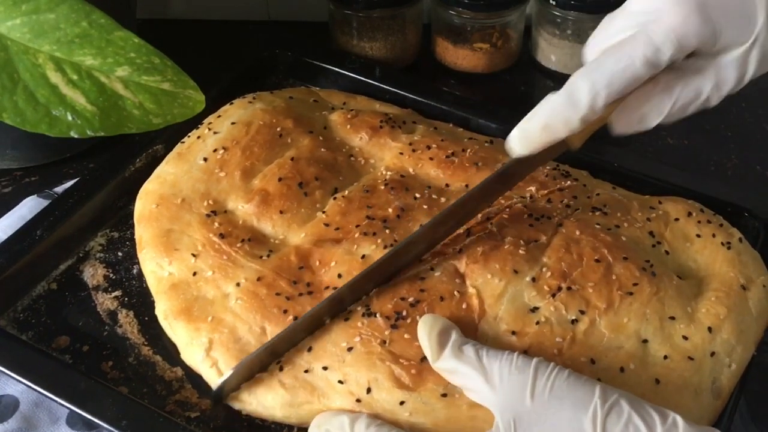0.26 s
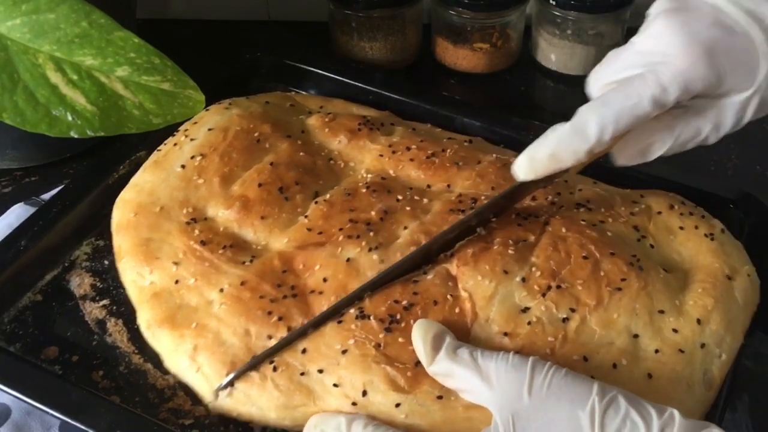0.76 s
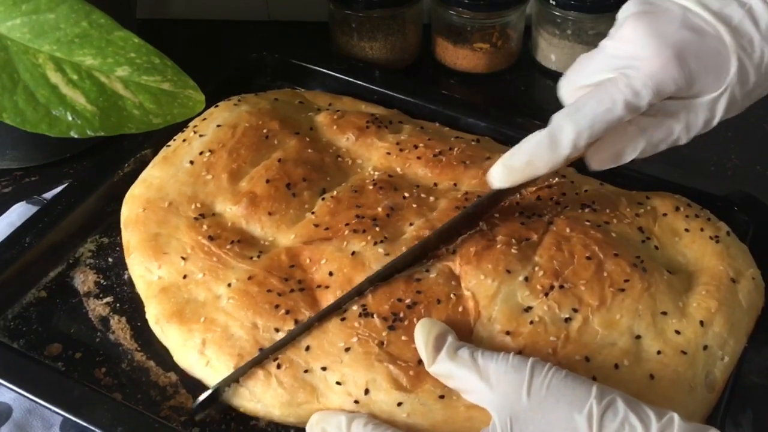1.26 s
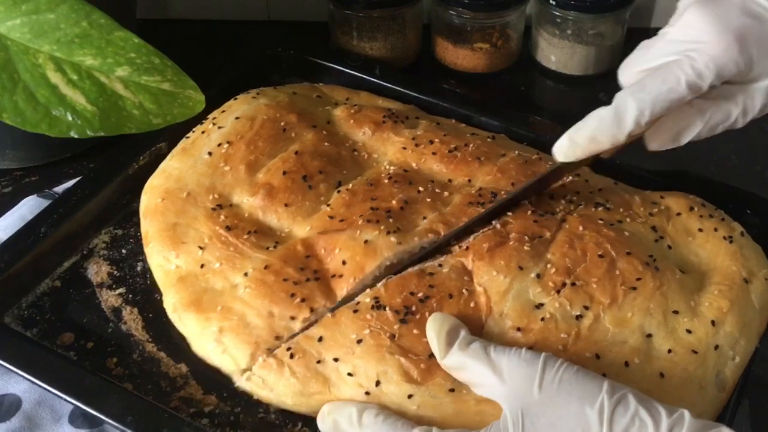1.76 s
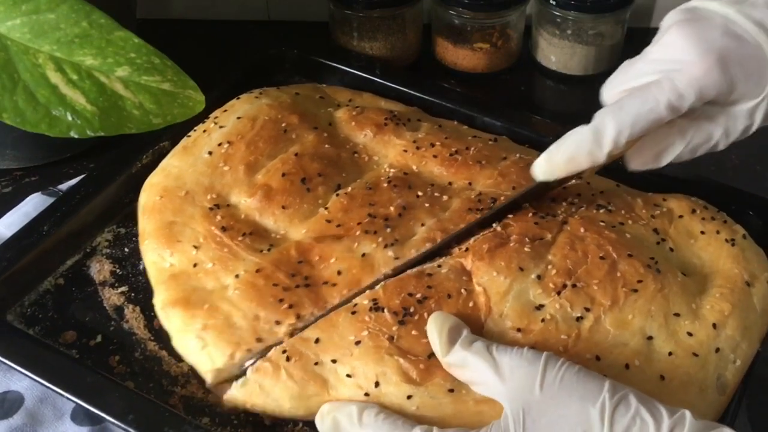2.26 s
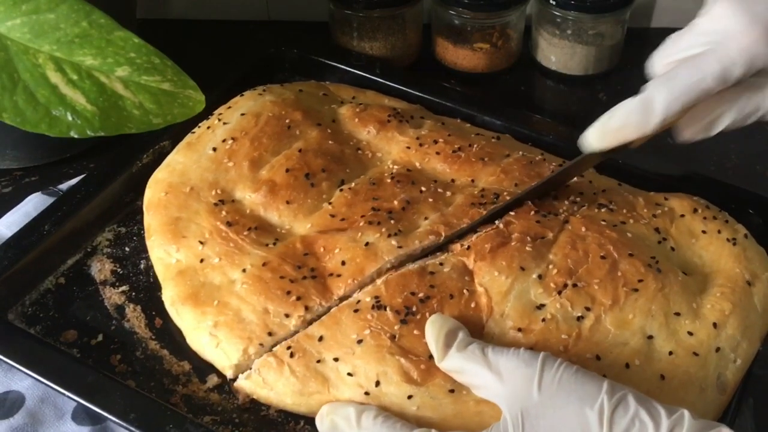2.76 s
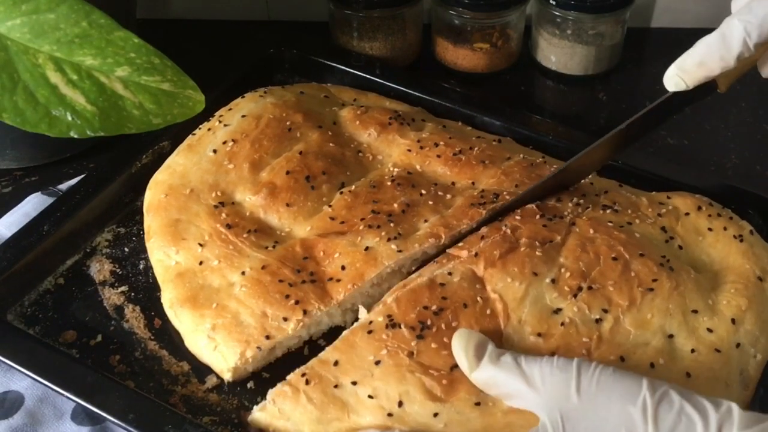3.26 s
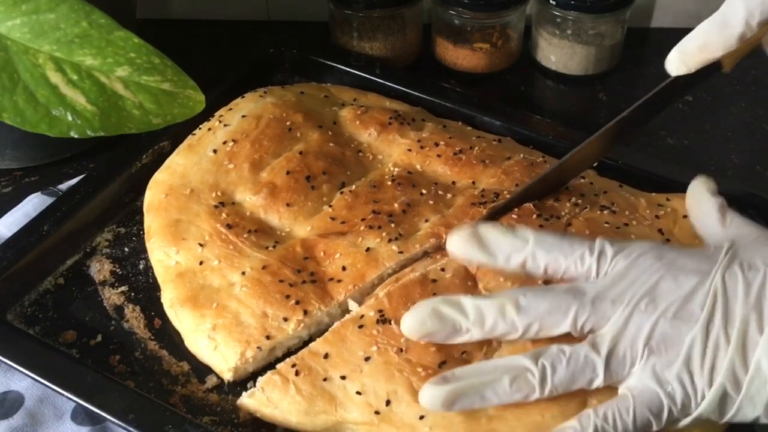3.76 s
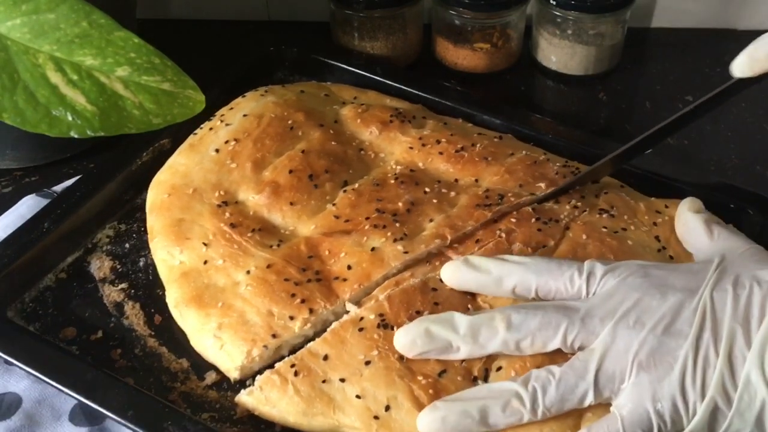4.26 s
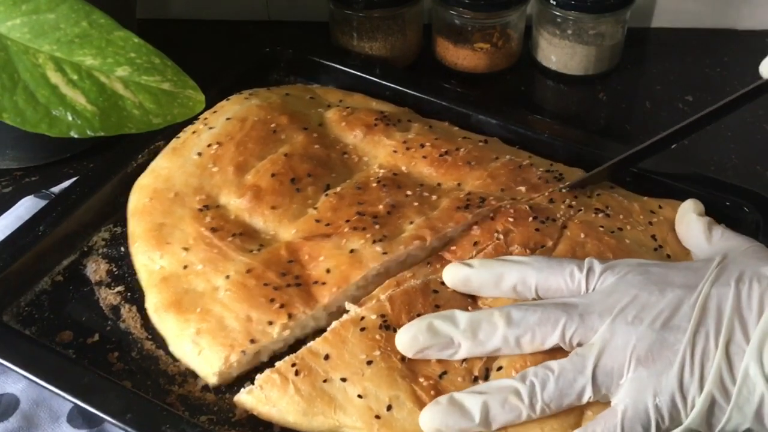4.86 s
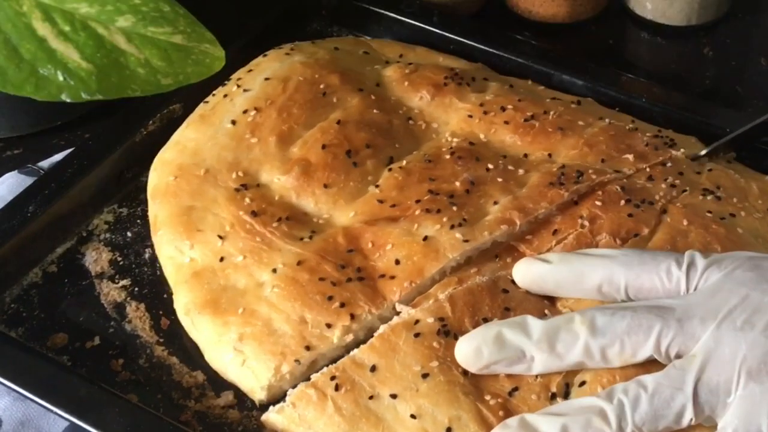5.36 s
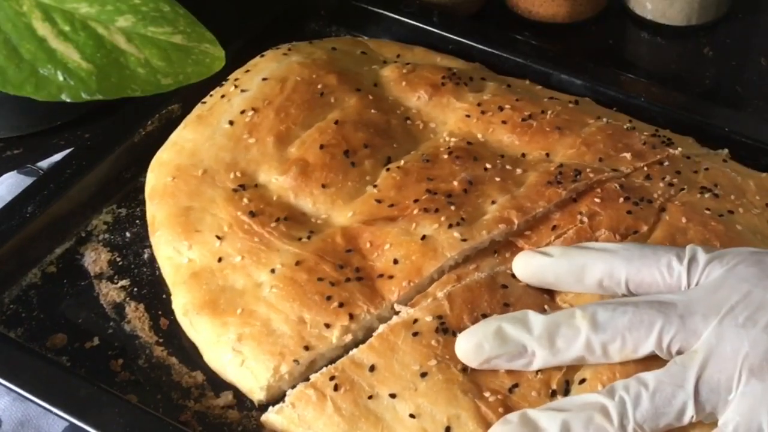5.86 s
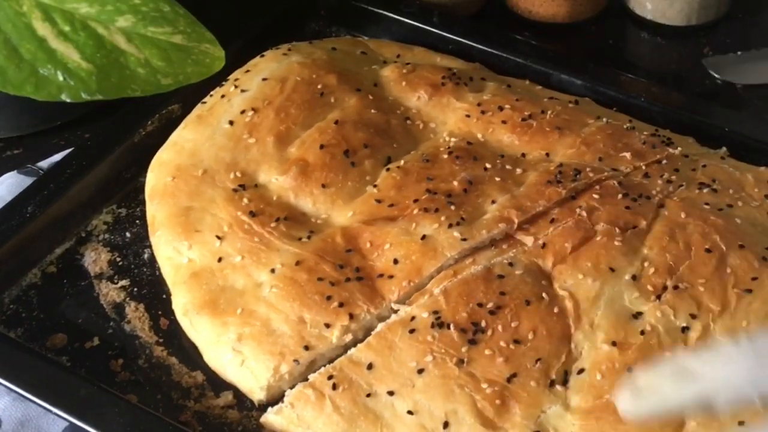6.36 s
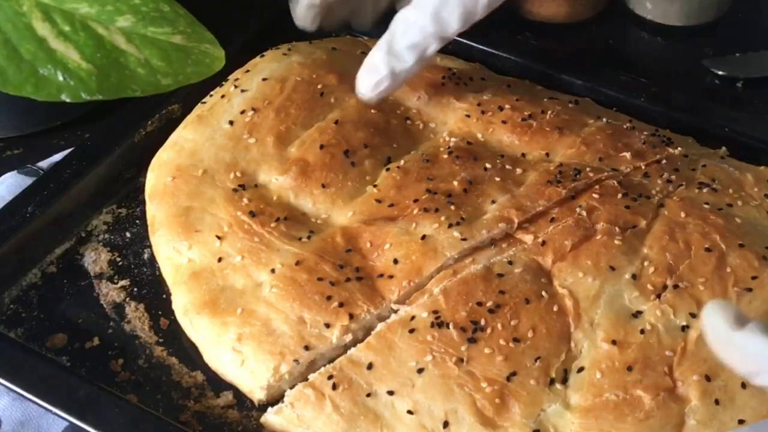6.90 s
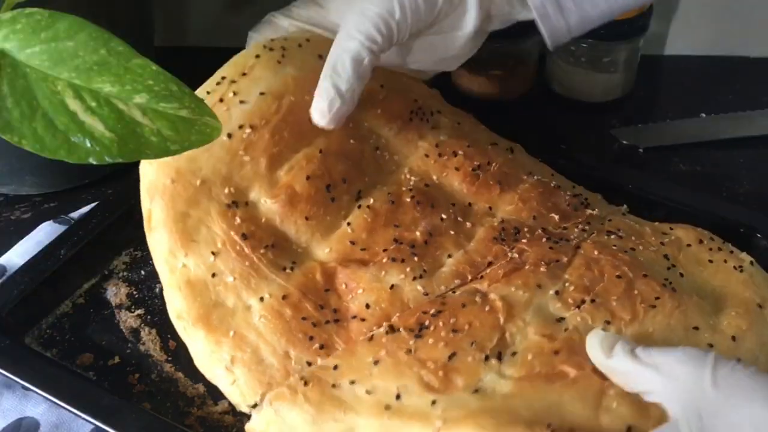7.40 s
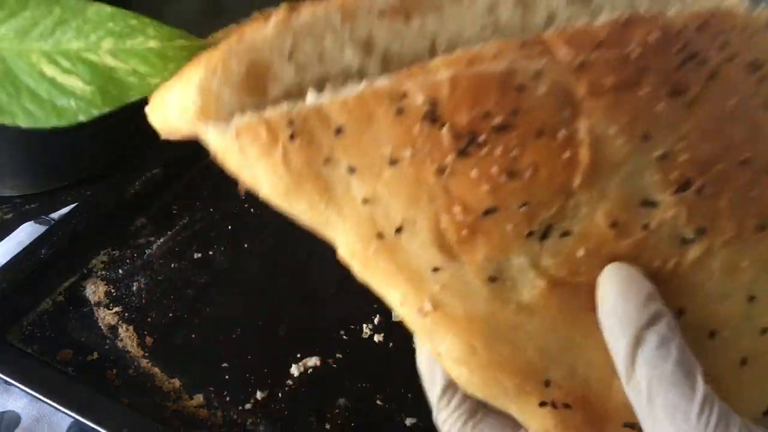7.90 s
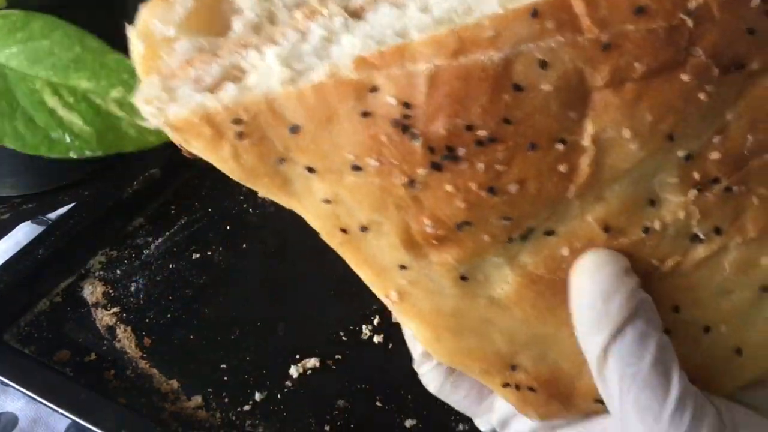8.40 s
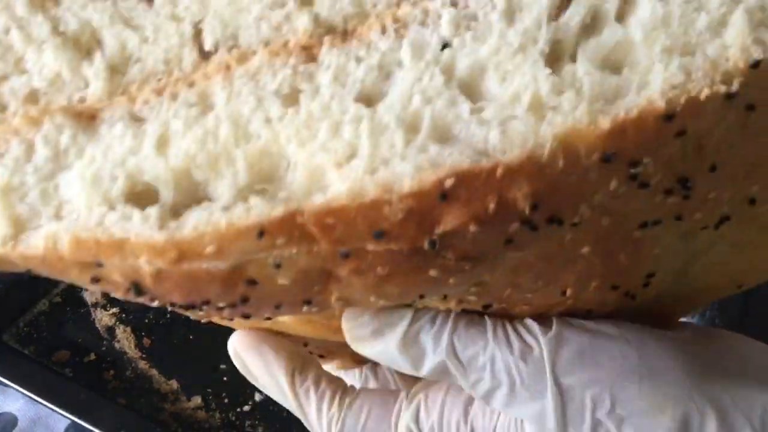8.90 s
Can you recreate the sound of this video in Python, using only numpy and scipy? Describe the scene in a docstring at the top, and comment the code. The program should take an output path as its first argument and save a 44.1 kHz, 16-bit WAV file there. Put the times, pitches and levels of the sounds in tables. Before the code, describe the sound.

A quiet kitchen, heard close, with a low mains-like hum and faint air throughout. From 0 to 2 s, a serrated knife makes soft, bright, dry rasps on bread crust, with a barely audible thin metallic singing at first and light tray touches near 1.2 and 1.5 s. A sharp knock lands at 2.1 s, another at 2.5 s, among duller, grainier strokes. Sawing stays faint until a hard crack at 4.25 s. A tight cluster of knocks comes at 5.0 s, then from 5.3 to 5.8 s a rapid, irregular metallic rattle with crunch, ending in a stronger rasp. Small clicks at 6.1 s precede a loud double clack at 6.34 s as the knife lies down, settling by 6.7 s. Until about 9 s, only faint glove rubs, tiny crust ticks and fine crackle remain. The level dips momentarily near 5.2, 7.0 and 7.9 s.

```python
"""A low hum and faint rasping strokes open: a serrated knife saws a crusty loaf on a baking tray in a kitchen.
Rasps are dense random slips; teeth catching on the tray strike its decaying modes, with cracks and rattle.
The knife is laid on the counter (blade modes and clicks), then gloves rub the loaf and its crust ticks
(noise puffs). Filtered noise and tones make the room; the level dips briefly three times."""
import sys
import numpy as np
from scipy import signal
from scipy.fft import rfft, irfft, next_fast_len
from scipy.io import wavfile
from scipy.ndimage import uniform_filter1d

SR = 44100
rng = np.random.default_rng(int(sys.argv[2]) if len(sys.argv) > 2 else 0)


def wav_out(sig):
    """Save sig, one row per channel (or a flat mono array), as 16-bit PCM at SR to the path in sys.argv[1]."""
    wavfile.write(sys.argv[1], SR, np.round(np.clip(np.atleast_2d(sig).T, -1, 1) * 32767).astype(np.int16))


def undo_db(level):
    """Turn decibels back into plain size, where 20 dB means ten times bigger."""
    steps = np.asarray(level, float) / 20
    return 10 ** steps


N = 403074

# room air spectrum: pitch_hz, relative_density_db
ROOM_SPECTRUM = [(18, -55), (30, -41.5), (48, -19.5), (103, -6.5), (127, -11.5), (204, -17), (262, -21),
                 (311, -16), (473, -24.5), (684, -22), (1670, -27.5), (2610, -35.5), (4420, -42.5),
                 (13000, -53.5), (16000, -62)]
# appliance drone envelope: time_s, level_db
DRONE_LEVEL = [(0, -52.5), (1.14, -67), (1.37, -53.5), (4.27, -53.5), (4.73, -44), (5.06, -63.5),
               (6.16, -54), (9.14, -59.5)]
# decay of the kitchen reflections: pitch_hz, t60_s
KITCHEN_DECAY = [(300, 0.29), (1500, 0.55), (4000, 0.29), (12000, 0.34)]
# crust and crumb fractures: start_s, relative_level_db, puff_centre_hz
CRUST_TICKS = [(0.1106, -55, 10600), (1.1775, -39, 3600), (1.5005, -49, 9100), (2.2044, -47, 3180),
               (2.2314, -45, 4400), (2.24, -36, 1800), (2.2409, -43, 6940), (2.468, -39, 2950),
               (3.0066, -51, 4300), (3.483, -42, 3690), (3.5297, -40.5, 3060), (4.811, -40, 2300),
               (4.8324, -45, 3110), (5.0683, -44, 3400), (5.174, -39, 3010), (5.5426, -39.5, 3157),
               (6.7986, -43, 5360), (6.8528, -51, 4530), (6.9648, -38.5, 4420), (6.9724, -44, 6240),
               (6.982, -45, 5280), (7.17, -41, 13200), (7.3495, -44, 13200), (7.3692, -49, 5940),
               (7.4205, -42.5, 3110), (7.4794, -45, 6170), (7.695, -44, 1400), (7.6975, -50, 6200),
               (7.716, -37.5, 4030), (8.0461, -48.5, 3700), (8.085, -49, 11500), (8.1225, -50, 8060),
               (8.4896, -45, 5450), (8.524, -49, 12000), (8.587, -48, 3580), (8.8144, -51, 3260),
               (8.9426, -45, 12900)]
# knife touching the counter: start_s, relative_level_db, low_mode_gain_db
COUNTER_TOUCHES = [(6.1148, -22.5, 7), (6.1215, -30, -2), (6.1409, -30, 3), (6.1614, -33, 3),
                   (6.171, -39, -10), (6.186, -35, -2), (6.205, -41, -15), (6.219, -37, -15),
                   (6.2634, -42, -20), (6.2787, -35.5, -33), (6.3394, -10, -0.5), (6.3492, -10.5, -20),
                   (6.479, -27.5, -28), (6.508, -26, -6), (6.5273, -31, 22), (6.543, -24.5, -13),
                   (6.5566, -25.5, -8.5), (6.5764, -27, -20), (6.6084, -31.5, -23), (6.6554, -38, -23),
                   (6.667, -42, -24)]
# blade modes: pitch_hz, level_db, t60_s, lying_down_gain_db
BLADE_MODES = [(2093, -3, 0.076, 7.5), (2630, 4.5, 0.036, -7), (3440, 2, 0.048, -4), (4280, -11, 0.06, 7),
               (5080, -8, 0.035, 2), (5820, -15.5, 0.12, 14), (6200, -17, .04, 3), (6960, -13, .07, -15),
               (8900, -27, 0.04, -3), (11850, -21.5, 0.1, 9), (14100, -4, 0.012, 3), (1530, 0, 0.026, -7),
               (826, -6, 0.012, 1)]
# gloves rubbing on the crust: start_s, length_s, relative_level_db
GLOVE_RUBS = [(6.49, 0.13, -62), (6.93, 0.18, -67), (7.4, 0.15, -61), (7.68, 0.096, -75),
              (8.48, 0.038, -65), (8.59, 0.21, -64.5), (8.93, 0.041, -68)]
# blade strokes through the crust: start_s, length_s, relative_level_db
KNIFE_STROKES = [(.07, 0.12, -72), (.23, 0.12, -67.5), (.4, 0.14, -61), (.55, 0.12, -62),
                 (.73, 0.11, -62.5), (1.06, 0.14, -68), (1.26, 0.12, -63.5), (1.44, .13, -67.5),
                 (1.57, 0.063, -65.5), (1.62, 0.11, -63), (1.8, 0.2, -60), (2.012, 0.056, -43.5),
                 (2.27, 0.046, -57.5), (2.36, .125, -53.5), (2.55, 0.15, -61), (2.73, 0.18, -54.5),
                 (2.995, 0.056, -60.5), (3.44, 0.16, -68.5), (3.74, 0.097, -64), (4.03, 0.064, -68.5),
                 (4.36, 0.12, -66), (4.49, 0.087, -67.5), (4.8, 0.081, -59.5), (4.9, 0.22, -67),
                 (5.22, 0.12, -65.5), (5.69, 0.063, -45.5)]
# bright rasp spectrum: pitch_hz, relative_density_db
RASP_SPECTRUM = [(1470, -21), (2500, 3), (4270, 6), (5560, 6), (7420, 4), (8800, 7), (10500, -1),
                 (12800, 2.5), (16000, -3)]
# teeth catching on the tray: start_s, level_db, relative_treble_db, favoured_pitch_hz
TRAY_CATCHES = [(.002, -41.5, -64, 1730), (1.1833, -30, -51, 2380), (1.5288, -37, -55, 2360),
                (1.543, -40.5, -69, 1740), (1.917, -37.5, -54, 2400), (1.934, -33, -61, 2450),
                (2.031, -29, -48, 3600), (2.0869, -13, -31, 2560), (2.112, -43, -66, 3180),
                (2.4907, -17.5, -37.5, 2090), (4.2523, -10, -24, 2070), (4.8438, -35, -60, 1400),
                (4.974, -10, -28, 1900), (4.9914, -10, -39, 2590), (5.011, -11, -40, 2500),
                (5.03, -13, -36, 2670), (5.047, -12, -38, 2620), (5.127, -29, -62, 2530),
                (5.138, -20.5, -41, 2210), (5.3153, -13.5, -34, 3100), (5.3267, -11, -49.5, 2566),
                (5.3454, -11, -46, 2630), (5.354, -17, -45.5, 2570), (5.3694, -13, -38.5, 2695),
                (5.3974, -13, -31.5, 3025), (5.411, -21, -55, 2840), (5.439, -19, -41.5, 2570),
                (5.4918, -23.5, -44.5, 2280), (5.5102, -14.5, -38.5, 2480), (5.5227, -18, -40.5, 2250),
                (5.6055, -20, -51.5, 3150), (5.6295, -20, -41, 1390), (5.6364, -9.5, -31.5, 3150),
                (5.6487, -22, -56, 2542), (5.661, -7, -26.5, 2840), (5.681, -9.5, -34, 3200),
                (5.6995, -11.5, -31, 1314), (5.7255, -16.5, -35, 3000), (5.762, -20, -39, 2800)]
# tray modes: pitch_hz, level_db, t60_s, flat_blade_gain_db, light_touch_gain_db
TRAY_MODES = [(387, -26.5, 0.076, 5, 7), (675, -18.5, 0.011, 15.5, -3), (1175, -11.5, 0.036, -1, 4),
              (1330, -4, 0.024, -5.5, 5), (1425, -9.5, 0.046, -3.5, 0), (1755, -2, 0.0137, -10.5, 12),
              (1900, -2, 0.012, -2, 8), (2085, -10, 0.021, 6.5, -4), (2300, -2.5, 0.014, 0.5, -4),
              (2450, -13.5, 0.037, 1, 14), (2560, -2, 0.024, 0.5, -5.5), (2906, -5, 0.0086, 4, -20),
              (3080, -2.5, 0.013, -2, -3), (3200, -2.5, 0.019, 5.5, -11), (3650, -16.5, 0.026, 6, 3),
              (3894, -7.5, 0.018, -1, -3.5), (4450, -12.5, 0.02, -4, 5), (800, -23.5, 0.02, 11, -8),
              (1060, -21.5, .02, 4, -5), (4890, -15.5, 0.01, 6, -2), (5395, -15.5, 0.013, 9.5, -7)]
# brief level dips: centre_s, half_length_s
LEVEL_DIPS = [(5.201, 0.026), (7.034, 0.033), (7.864, 0.027)]

GRIT_LIGHT, GRIT_HARD = .8, .35  # unevenness of the contact drive
DETUNE = .012  # relative mode scatter per catch: the loaf loads the tray differently
SPOT_SCATTER_DB = 2


def evened(x):
    """Scales to rms 1."""
    return x / np.sqrt(np.mean(x ** 2) + 1e-20)


def read(points, hz):
    """Reads a spectrum table on a log-frequency axis."""
    f, value = np.transpose(points)
    return np.interp(np.log(hz + 1), np.log(f + 1), value)


def curve(rows):
    """Columns of a curve table at every sample."""
    s, *columns = np.transpose(rows)
    return [np.interp(np.arange(N) / SR, s, c) for c in columns]


def add(mix, start_s, sound):
    """Mixes a sound in at a time."""
    part = mix[round(start_s * SR):][:len(sound)]
    part += sound[:len(part)]


def coloured(x, points):
    """Gives a long signal a spectrum, rms 1."""
    size = next_fast_len(len(x))
    gain = undo_db(read(points, np.fft.rfftfreq(size, 1 / SR)))
    return evened(irfft(rfft(x, size) * gain, size)[:len(x)])


def band(x, lo_hz, hi_hz):
    """Band-pass."""
    edges_hz = [lo_hz, min(hi_hz, .49 * SR)]
    return signal.sosfilt(signal.butter(2, edges_hz, "band", fs=SR, output="sos"), x)


def fuzzy(hz, width_hz):
    """A tone whose height and phase wander: narrow noise, rms 1."""
    r = np.exp(-np.pi * width_hz / SR)
    noise = rng.standard_normal(N) + 1j * rng.standard_normal(N)
    slow = signal.lfilter([1], [1, -2 * r, r * r], noise)
    return evened((slow * np.exp(2j * np.pi * hz * np.arange(N) / SR)).real)


def strike(modes, gains_db, contact_ms, ring_db=-99, ring_t60_s=.1, grit=GRIT_HARD, detune=DETUNE):
    """A short gritty contact swings up every mode; an after-ring spreads over its close neighbours."""
    t = np.arange(SR // 4) / SR
    hz, db, t60_s = np.transpose(modes)[:, :, None]
    u = t[:1500] * 1000 / max(contact_ms, .2)
    push = np.exp(-u ** 2) + 3.5 * np.exp(-8 * u)  # hardest at first touch
    a, b = rng.standard_normal((2, len(hz), 1500))
    rough = (a + 1j * b) * push / np.linalg.norm(push) / np.sqrt(2)
    drive = push / push.sum() + grit * rough
    swing = signal.fftconvolve(drive, undo_db(-60 * t / t60_s), axes=1)[:, :len(t)]

    tune, start = 1 + detune * rng.standard_normal(hz.shape), rng.random(hz.shape)
    spread, phase = rng.uniform(-0.85, 1, (2, 5, *hz.shape))
    neighbours = np.sin(2 * np.pi * hz * (1 + .08 * spread) * t + np.pi * phase).sum(0) / 2
    # ring_t60_s holds near 3500 Hz; lower modes last longer
    after_env = undo_db(ring_db - 60 * t / ring_t60_s * (0.5 + (hz / 5000) ** 2))
    after = neighbours * after_env * np.minimum(t * 1000 / contact_ms, 1)
    ring = (swing * np.exp(2j * np.pi * (hz * tune * t + start))).real + after
    soft = (1 - np.exp(-t / .0004)) ** 2  # gradual contact: no thump under the modes
    sound = (undo_db(db + gains_db[:, None]) * ring).sum(0) * soft
    return sound / np.sqrt(uniform_filter1d(sound[:2000] ** 2, 150).max() * 5)


def crack(decay_ms, lo_hz):
    """A puff of noise with an exponential decay."""
    t_ms = np.arange(0, 6 * decay_ms + 5, 1000 / SR)
    noise = rng.standard_normal(len(t_ms)) * np.exp(-t_ms / max(decay_ms, .2))
    return band(noise, lo_hz, 16700) / 2


def motion(rows, peak_share):
    """Loudness of rubbing: the hand speeds up until peak_share of the row has passed, then slows."""
    out = np.zeros(N)
    for start_s, length_s, db in rows:
        u = np.linspace(0, 1, round(length_s * SR))
        angle = np.interp(u, [0, np.clip(peak_share, .05, .95), 1], [0, np.pi / 2, np.pi])
        add(out, start_s, undo_db(db) * np.sin(angle))
    return out


def patchy(x, patchy_db):
    """Narrow bands that swell and fade at random for a few hundredths of a second."""
    z = signal.stft(x, nperseg=256)[2]
    patches = uniform_filter1d(rng.standard_normal(z.shape), size=3, axis=0)
    patches = evened(uniform_filter1d(patches, size=14, axis=1))
    return evened(signal.istft(z * undo_db(patchy_db * patches), nperseg=256)[1][:N]) * x.std()


def room_tone():
    """Steady kitchen air with a mains buzz, a drone that comes and goes, a low rumble and faint hiss."""
    room_db, buzz_db = -57, -55
    rumble_db, rumble_db_per_s = -63, 1.17
    mids_low_db, mids_top_db, mids_top_s, mids_width_s = -4, 3.5, 5.7, 2.57
    hiss_db, hiss_rise_db, hiss_rise_s = -88, 9, 3.9
    t = np.arange(N) / SR
    air = coloured(rng.standard_normal(N), ROOM_SPECTRUM)
    air /= band(air, 153, 16400).std()
    # the range around 1 kHz swells once
    swell = np.exp(-((t - mids_top_s) / mids_width_s) ** 2)
    mids_db = mids_low_db + (mids_top_db - mids_low_db) * swell
    air += band(air, 584, 2550) * (undo_db(mids_db) - 1)
    buzz = evened(np.sin(2 * np.pi * 101 * t) + .28 * fuzzy(102, 5.8) + .2 * fuzzy(201, 8))
    drone = evened(np.sin(2 * np.pi * 66.5 * t) + 0.3 * fuzzy(65, 18))
    rumble = undo_db(rumble_db + rumble_db_per_s * t) * fuzzy(53, 6.3)
    hiss = evened(band(rng.standard_normal(N), 5360, 18120))
    hiss *= undo_db(hiss_db + hiss_rise_db * (t > hiss_rise_s))
    return hiss + undo_db(room_db) * air + undo_db(buzz_db) * buzz + undo_db(curve(DRONE_LEVEL)[0]) * drone + rumble


def kitchen(x):
    """Sparse reflections of random sign, each band dying at its own speed; two sets of paths alternate."""
    turn, out = 2 * np.pi * 9 * np.arange(N) / SR, np.zeros(N)
    for share in (np.cos(turn), np.sin(turn)):
        taps = np.zeros(SR)
        at = np.arange(200, SR - 20, 20)
        taps[at + rng.integers(0, 20, len(at))] = rng.choice([-1., 1.], len(at))
        hz, t, z = signal.stft(taps, SR, nperseg=256)
        decay = undo_db(-60 * t / read(KITCHEN_DECAY, hz)[:, None])
        tail = signal.istft(z * decay, SR, nperseg=256)[1]
        out += signal.fftconvolve(x * abs(share), tail / np.linalg.norm(tail))[:N]
    return out


def ticks():
    """Tiny dry fractures: a bright puff of noise, strongest in a wide band of its own."""
    crumbs_per_s, weakest_crumb_db, lift_s = 25, -62, 6.7  # random crackle once the loaf is lifted
    lifted_s = N / SR - lift_s
    out, count = np.zeros(N), int(crumbs_per_s * lifted_s)
    when, size, pitch = rng.random((count, 3)).T
    crumb_db = weakest_crumb_db - 2.2 * np.log(1 - size)
    crumbs = np.c_[lift_s + when * lifted_s, crumb_db, 4000 * 3.3 ** pitch]
    for start_s, db, hz in [*CRUST_TICKS, *crumbs]:
        puff = crack(3.0, 800)
        sound = 0.44 * band(puff, 2500, 16000) + band(puff, hz / 1.21, hz * 1.29)
        add(out, start_s, undo_db(db + 5.5) * sound)
    return out


def clinks():
    """The blade rings in its modes and clicks on the hard counter."""
    lies_down_s = 6.3
    soft_share, damped_share = 0.17, 0.47  # dB of ring lost per dB of softer touch, of missed low modes
    out, modes = np.zeros(N), np.array(BLADE_MODES)[:, :3]
    hz, *_, down_db = np.transpose(BLADE_MODES)
    for start_s, db, low_db in COUNTER_TOUCHES:
        gains_db = (hz < 3800) * low_db + down_db * (start_s > lies_down_s)
        gains_db = gains_db + 2 * SPOT_SCATTER_DB * rng.standard_normal(len(hz))
        ring_db = db + soft_share * db - 7.5 + damped_share * min(low_db, 0)
        ring = strike(modes, gains_db, 1.6, grit=GRIT_LIGHT, detune=DETUNE / 4)
        add(out, start_s, undo_db(ring_db) * ring)
        add(out, start_s, undo_db(db - 8) * crack(3.4, 560))
        add(out, start_s, undo_db(db - 15) * crack(3, 12000))  # the highest, densest modes
        add(out, start_s, undo_db(db - 22) * crack(28, 780))  # chatter as the blade settles
    return out


def singing_blade(t):
    """A blade mode bowed by teeth skating on the hard top crust: a narrow wandering tone, broken at random."""
    sing_db, fade_db_per_s, until_s = -4, 6, 1.3  # level against the stroke
    broken = undo_db(5 * evened(uniform_filter1d(rng.standard_normal(N), 1200)))
    return undo_db(sing_db - fade_db_per_s * t) * fuzzy(12570, 90) * (t < until_s) * broken


def rubbing():
    """Strokes and gloves: dense tiny slips of uneven size, bright and dull; strokes add a singing blade."""
    dull_db, deeper_db_per_s, dullest_db = -8.5, 4, 11  # dull part grows as the blade sinks to the tray
    glove_dull_db = 2
    idle_gain_db, idle_from_s = -74, .9  # faint singing between strokes
    t = np.arange(N) / SR
    slip_size = undo_db(5.2 * np.minimum(rng.exponential(1, (2, N)), 3.6))
    large = rng.random((2, N)) < 600 / SR  # 600 per second on average
    slips = rng.standard_normal((2, N)) * (1 + slip_size * large)
    bright = coloured(slips[0], RASP_SPECTRUM)
    bright /= band(bright, 3100, 17000).std()

    # the slips also stir the tray
    tray = strike(np.array(TRAY_MODES)[:, :3], np.zeros(len(TRAY_MODES)), .4, -14, .12)
    stirred = band(signal.oaconvolve(slips[1], tray)[:N], 1100, 6000)
    dull = evened(evened(band(slips[1], 950, 3900)) + 0.61 * evened(stirred))

    # the crust grips unevenly
    snags = undo_db(2.6 * evened(uniform_filter1d(rng.standard_normal((2, N)), 160)))
    bright = patchy(bright, patchy_db=1.8) * snags[0]
    dull = patchy(dull, patchy_db=3.5) * snags[1]
    singing = singing_blade(t)
    dull_gain = undo_db(np.minimum(dull_db + deeper_db_per_s * t, dullest_db))
    blade = motion(KNIFE_STROKES, 0.53) * (bright + dull_gain * dull + singing)
    blade += undo_db(idle_gain_db) * singing * (t > idle_from_s)
    gloves = motion(GLOVE_RUBS, 0.31) * (bright + undo_db(glove_dull_db) * dull)
    return blade + gloves


def thin_ring(spot_hz):
    """One lasting tray mode with a 60 Hz beat, weaker the lower the pitch of the spot."""
    hz, level_db, t60_s, beat_hz = 3180, -15, 0.3, 60  # level under the blow for a spot at hz
    t = np.arange(SR // 3) / SR
    env = undo_db(level_db - 36 * np.log(hz / spot_hz) - 60 * t / t60_s) * np.minimum(t / .003, 1)
    return env * (1 + .5 * np.cos(2 * np.pi * beat_hz * t)) * np.sin(2 * np.pi * hz * t)


def knocks():
    """Every catch rings the tray modes, favouring those near the spot's pitch, plus crunch, rattle and crack."""
    flat_until_s = 4.5  # later the blade tilts and its teeth rattle
    light_below_db = -25  # a flat catch this soft is a light touch
    drag_below_db, drag_ms_per_db = -18, 0.63  # a soft flat touch scrapes for longer
    out, (hz, db, t60_s, flat_db, light_db) = np.zeros(N), np.transpose(TRAY_MODES)
    for start_s, level_db, treble_db, spot_hz in TRAY_CATCHES:
        flat = start_s < flat_until_s
        light = flat and level_db < light_below_db
        if flat:
            contact_ms, ring_db = 3.6 + drag_ms_per_db * max(drag_below_db - level_db, 0), -36
        else:
            contact_ms, ring_db = 5.16, -26.5
        gains_db = 5.6 * np.exp(-(np.log(hz / spot_hz) / 0.17) ** 2) + flat_db * flat + light_db * light
        gains_db = gains_db + SPOT_SCATTER_DB * rng.standard_normal(len(hz))
        grit = GRIT_LIGHT if light else GRIT_HARD
        blow = strike(np.c_[hz, db, t60_s], gains_db, contact_ms, ring_db, 0.14, grit)
        add(out, start_s, undo_db(level_db) * blow)
        if flat and not light:
            add(out, start_s, undo_db(level_db) * thin_ring(spot_hz))
        crunch = band(crack(7.2, 1494), 1300, 4430)  # crushed crust
        add(out, start_s, undo_db(level_db - 8.5) * crunch)
        rattle = band(crack(80, 500), 600 if flat else 1200, 3300)  # tray buzzing on the counter
        add(out, start_s, undo_db(level_db - 20) * rattle)
        bright = band(crack(0.84 * contact_ms, 3330), 2006, 11000 if flat else 10000)
        add(out, start_s, undo_db(treble_db + 9.5) * bright)
    return out


def scene():
    """Close sounds, their reflections and the room tone."""
    ringing, noisy = knocks(), clinks() + ticks() + rubbing()
    far = undo_db(-13) * noisy + undo_db(-18.5) * ringing  # the loaded tray sends less to the walls
    return (ringing + noisy + kitchen(far) + room_tone())[None]


def roll_off(x):
    """The treble ends steeply here."""
    return signal.sosfilt(signal.butter(12, 16640, fs=SR, output="sos"), x)


def record(dry):
    """The microphone drops the deepest bass, top treble and a narrow dip; the level dips three times."""
    notch_hz, notch_share = 10470, 0.33
    heard = signal.sosfilt(signal.butter(4, 44, "high", fs=SR, output="sos"), dry)
    heard = signal.sosfilt(signal.butter(30, 15850, fs=SR, output="sos"), heard)
    heard = heard - notch_share * band(heard, notch_hz - 400, notch_hz + 400)
    t = np.arange(N) / SR
    dips = [np.clip(abs(t - centre_s) / half_s, .07, 1) for centre_s, half_s in LEVEL_DIPS]
    return roll_off(heard * np.prod(dips, 0))


dry = scene()
out = record(dry)
wav_out(out)
```